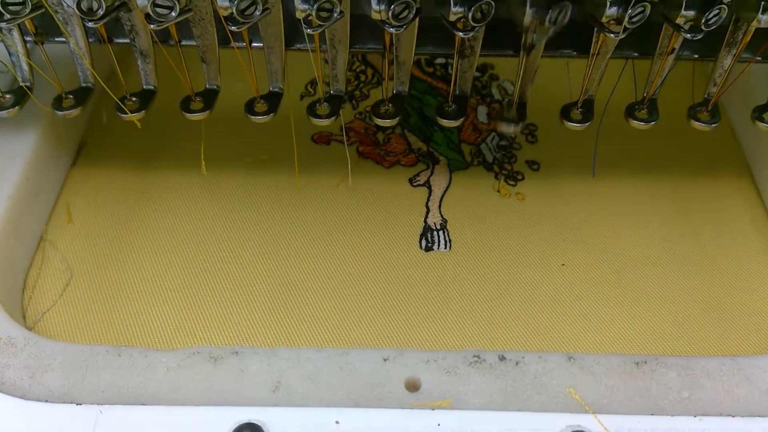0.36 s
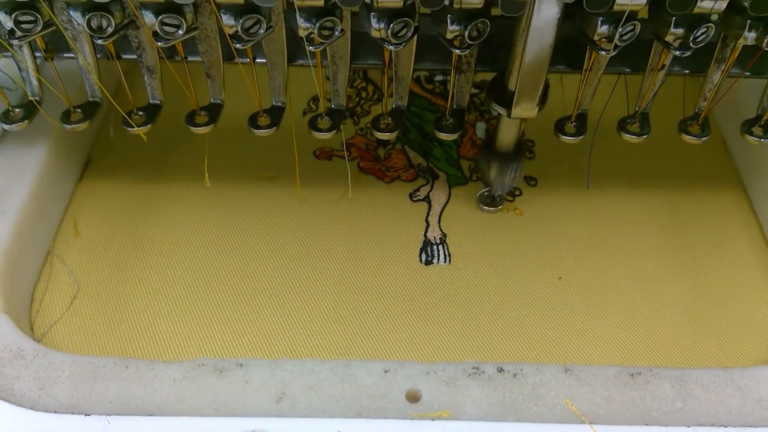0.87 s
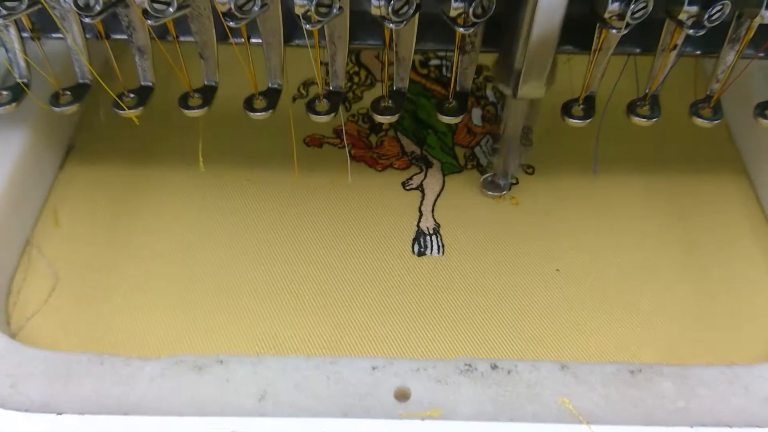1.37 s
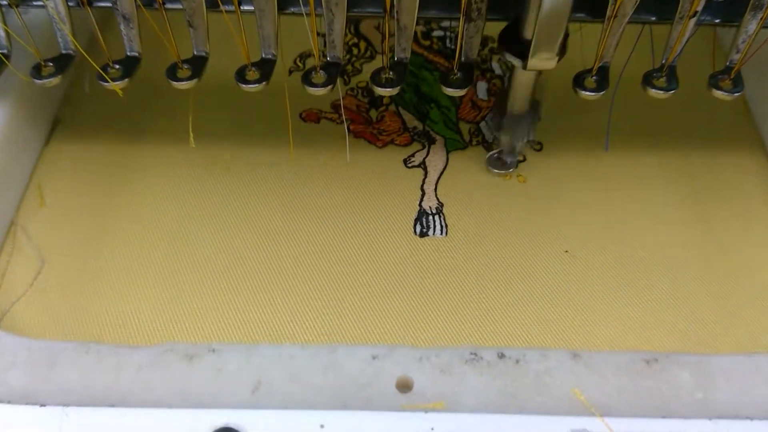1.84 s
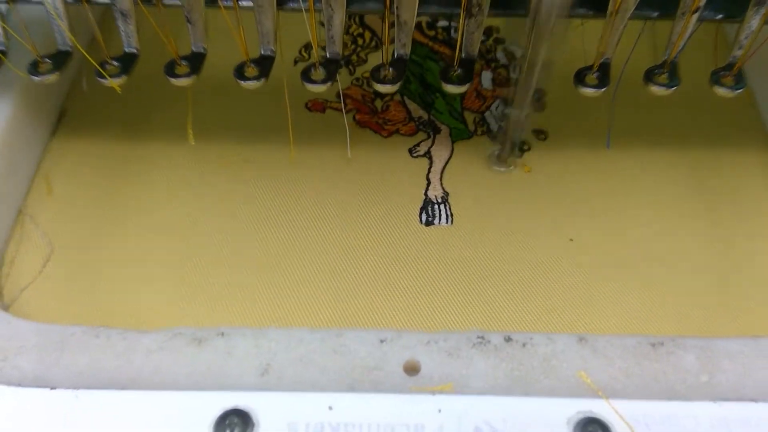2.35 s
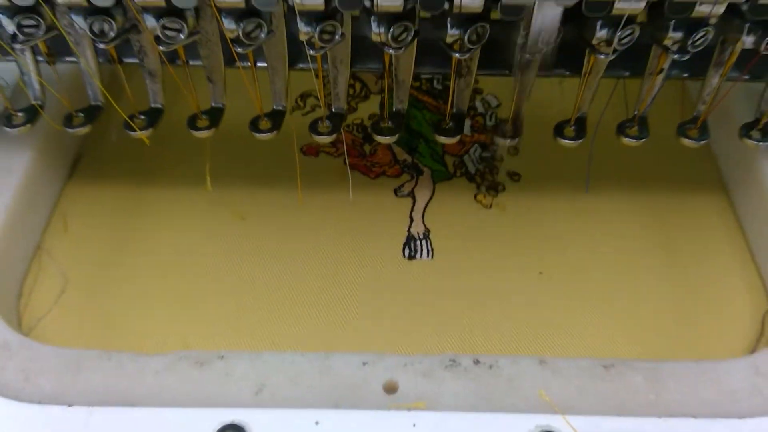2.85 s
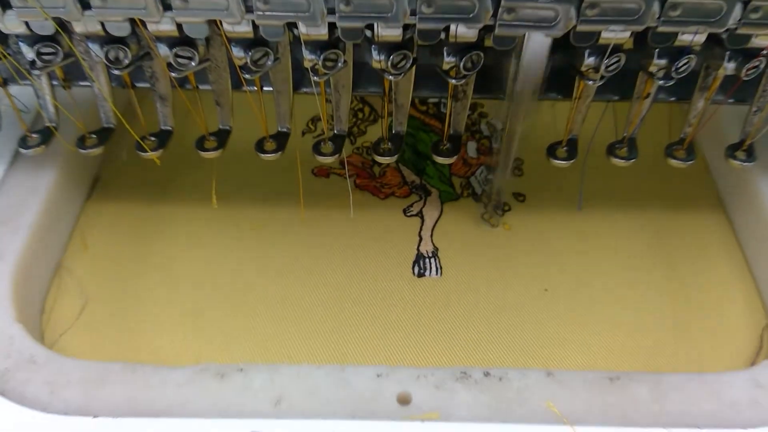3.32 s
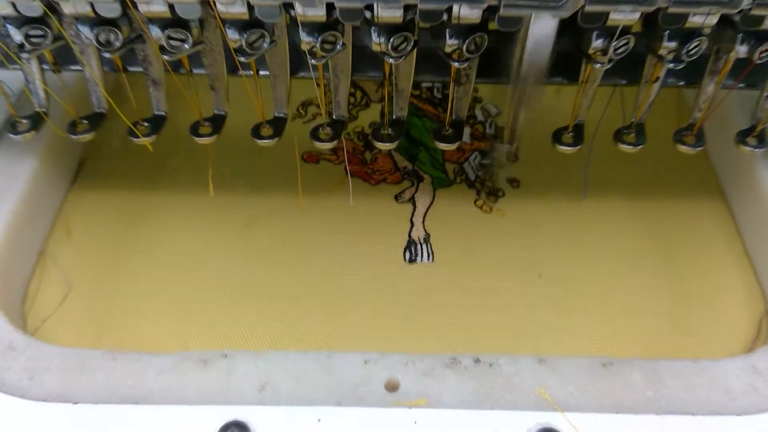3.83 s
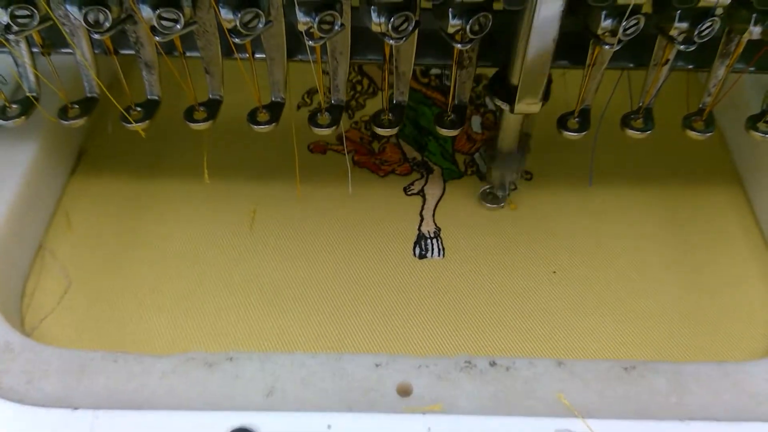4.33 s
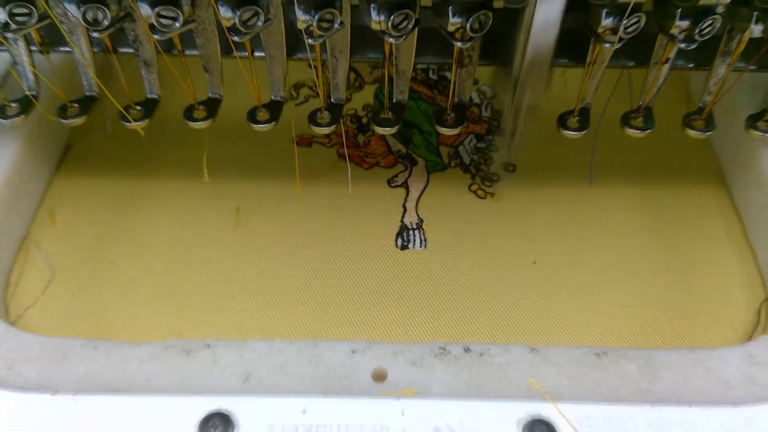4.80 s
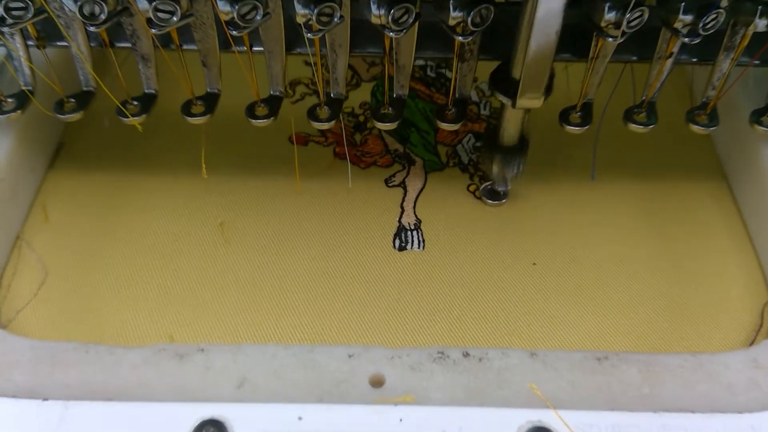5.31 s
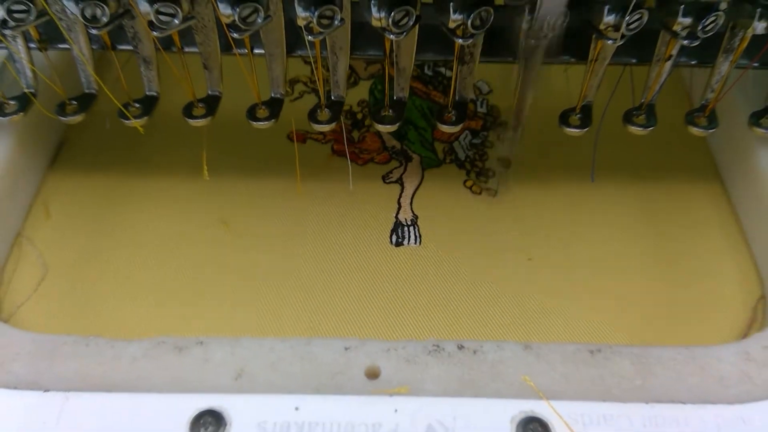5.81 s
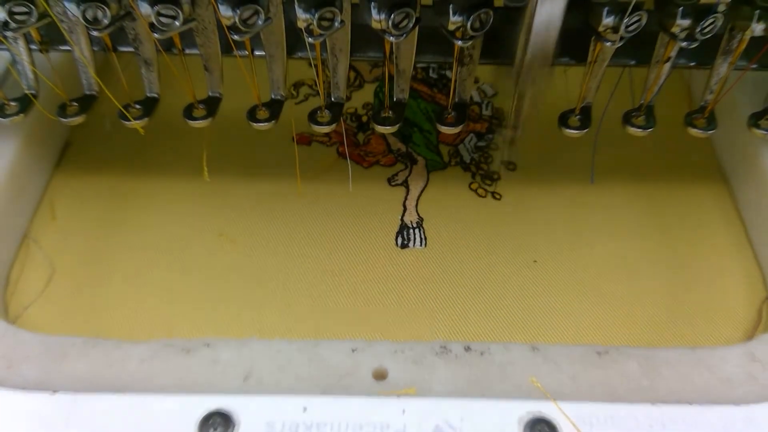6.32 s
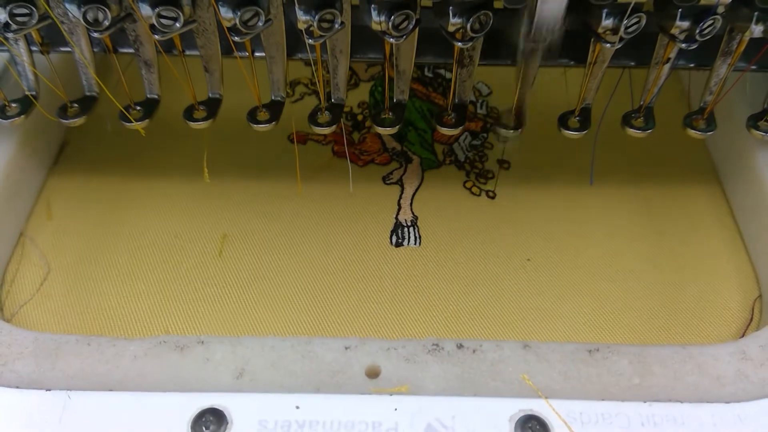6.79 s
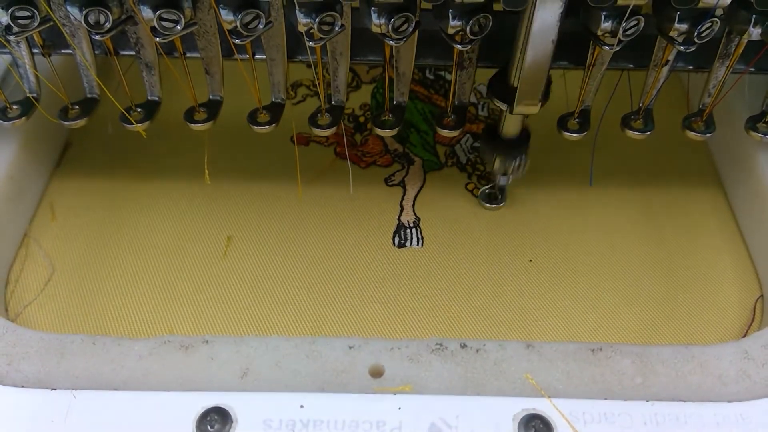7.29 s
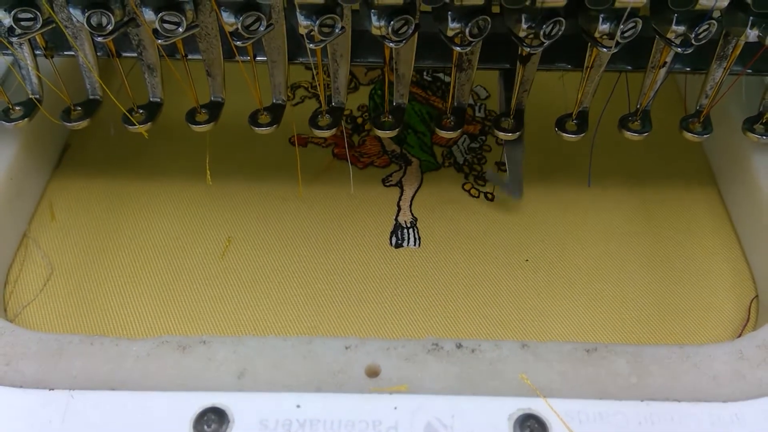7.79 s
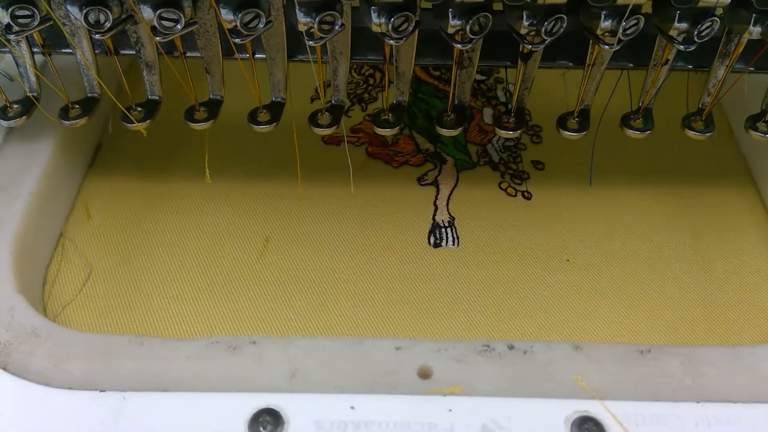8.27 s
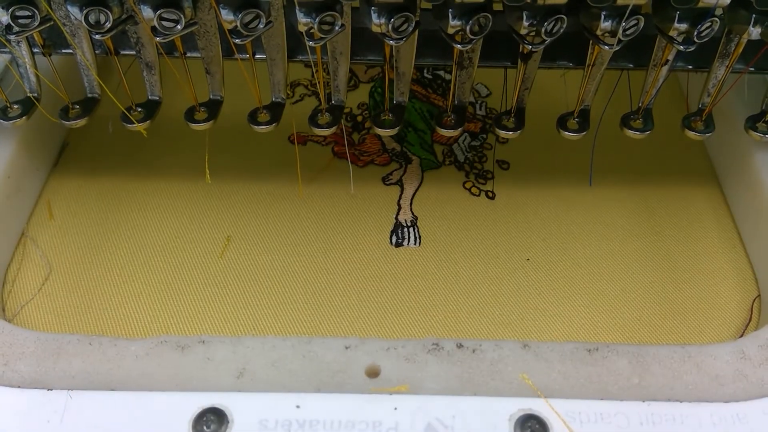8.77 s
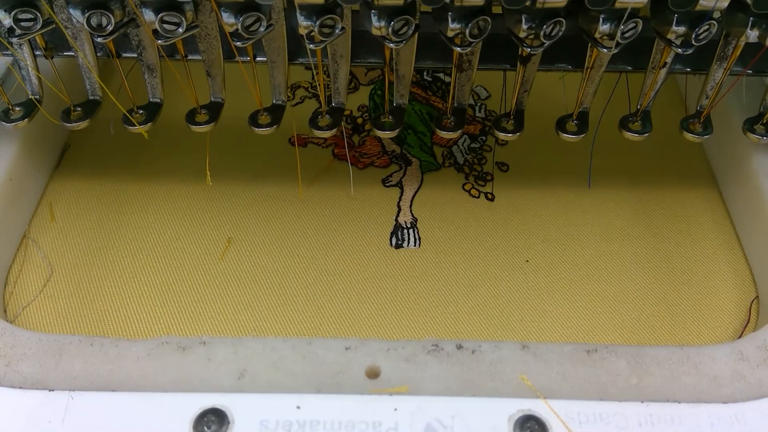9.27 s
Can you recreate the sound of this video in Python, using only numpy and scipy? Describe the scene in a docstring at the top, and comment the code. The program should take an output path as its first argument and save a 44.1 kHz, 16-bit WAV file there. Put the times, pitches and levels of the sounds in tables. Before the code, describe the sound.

A workshop hums softly with a steady fan drone around a close embroidery machine. Faint ticks and dull thuds sound near 0.1 and 0.4 seconds; at 0.7 to 0.9 small motors give a short, falling whirr. Slow first-turn clunks come around 1.2, and from about 1.35 the machine stitches at full speed, roughly thirteen strokes a second. Each stroke is a hard, bright metal clack with jingling needle bars, hook ticks and thin pings that come and go, above a rumbling, knocking bed whose hum swells and sinks. Between 1.6 and 2.6 the hook buzzes harder. It brakes at 6.8 and has stopped by about 7.2. A soft knock follows at 7.35, crisp cutter snaps at 7.6 to 7.8, low drive knocks until 7.95, then latch clicks at 8.23 and sharper ones at 8.46. Quiet hum and faint thuds remain until about 9.6. Bright metal sits right.

```python
"""An embroidery workshop, softly humming: a multi-needle machine starts, stitches about 13 times a second,
stops, then trims the thread and latches. In each shaft turn the presser foot and needle bar strike, the
arm rings, a loose part pings and the bed is knocked. Blows are short pushes that set fading sines ringing;
clatter, rumble and workshop are coloured noise; the hums are steady or wavering sines.
The near microphone port (right) hears the bright metal."""
import sys
import numpy as np
from scipy import signal
from scipy.io import wavfile
from scipy.ndimage import uniform_filter1d

SR = 44100
rng = np.random.default_rng(int(sys.argv[2]) if len(sys.argv) > 2 else 0)


def magnitude_from_level(level_db):
    """Linear magnitude for a level in decibels (20 dB per decade)."""
    exponent = np.asarray(level_db, float) / 20
    return 10 ** exponent


def waveform_to_disk(signal):
    """Save audio, clipped to [-1, 1], as 16-bit WAV at the path in sys.argv[1]."""
    frames = np.transpose(np.atleast_2d(signal))
    scaled = np.clip(frames, -1, 1) * 32767
    samples = np.round(scaled).astype(np.int16)
    wavfile.write(sys.argv[1], SR, samples)


N = 424918  # samples in the scene

SHAFT_HZ = 13.2525  # turns per second
BRAKE_S = 6.79  # the shaft starts to brake
HARDEST = 1.7  # upper limit of the random draws for blows
# for a spell the hook rings harder
DRAG_FROM_S, DRAG_TO_S, DRAG_DB = 1.6, 2.6, 2.9

# balance of the machine's noise between the ports: f/Hz, left minus right level/dB
TILT = [(60, -4), (150, 4), (380, -4), (950, -2), (2380, -3.5), (5980, -13), (15000, -14.5)]
# how alike the two ports hear that noise: f/Hz, likeness (-1 to 1)
SAME = [(60, 1), (180, 0.99), (550, 0.38), (1650, -0.24), (4970, -0.41), (15000, -0.12)]
# what the arm rings with: f/Hz, left level/dB, right level/dB, time to fade by 60 dB/s
ARM = [(1260, 1, 6.5, 0.13), (1450, -32, 4, 0.098), (1568, -5.5, 8, 0.031), (1870, -34, 8, 0.062),
       (2100, -23, -5.5, 0.16)]
# what the presser foot rings with: f/Hz, left level/dB, right level/dB, time to fade by 60 dB/s
FOOT = [(2710, -43, -9, 0.039), (2820, -30.5, -24, 0.13), (3560, -4, -12, 0.14), (3682, -41, 14, 0.051),
        (6200, -24, 1, 0.049)]
# what the needle bar rings with: f/Hz, left level/dB, right level/dB, time to fade by 60 dB/s
BAR = [(2670, -37, 2, 0.093), (3410, -16, -3, 0.19), (3770, -37, -14, 0.1), (4100, -31, -15, 0.076),
       (4860, -50, 0.5, 0.069), (5480, -47, 16.5, 0.019), (6200, -11, -8, 0.033), (6430, -15, -10, 0.081),
       (10280, -24, 0, 0.017), (11620, -26, -9, .014), (13500, -28, -16, .012)]


def read(points, hz):
    """Reads a table along log frequency."""
    f, value = np.transpose(points)
    return np.interp(np.log(hz + 1), np.log(f + 1), value)


def curve(rows, column):
    """Reads a dB column of a table along time, as gain."""
    rows = np.array(rows)
    return magnitude_from_level(np.interp(np.arange(N) / SR, rows[:, 0], rows[:, column]))


def waver(smooth_s):
    """Slow chance: noise smoothed twice, rms 1."""
    size = max(round(smooth_s * SR), 1)
    x = uniform_filter1d(uniform_filter1d(rng.standard_normal(N), size=size), size=size)
    return x / x.std()


def noise(spectrum, tilt, same, patchy_db):
    """Two partly alike channels of coloured noise with drifting patches; their mean has rms 1."""
    frames, hz = N // 256 + 5, np.fft.rfftfreq(1024, 1 / SR)
    a, b, c, d, patches = rng.standard_normal((frames, 513, 5)).T
    patches = uniform_filter1d(uniform_filter1d(patches, size=8, axis=0), size=8, axis=1)
    like = np.clip(read(same, hz), -1, 1)[:, None]
    side = magnitude_from_level(read(tilt, hz)[:, None] / 2)
    first, second = a + 1j * b, c + 1j * d
    z = np.array([first * side, (like * first + np.sqrt(1 - like ** 2) * second) / side])
    z *= magnitude_from_level(read(spectrum, hz)[:, None] + patchy_db * patches / patches.std())
    x = signal.istft(z, nperseg=1024, noverlap=768)[1][:, :N]
    return x / x.mean(0).std()


def strike(times, db, modes, scrape_ms, spread_db, ragged=0.88, wander=0, size=1):
    """A short push, smooth or ragged, wakes ringing modes unevenly; each blow's right-hand peak is db.

    Parts with play sit in one of five slightly detuned ways (wander is the share of pitch)."""
    hz, left_db, right_db, t60 = np.transpose(modes)
    t = np.arange(round(.8 * SR * t60.max())) / SR
    out = np.zeros((2, N + SR))
    seats = 1 + wander * rng.standard_normal((5 if wander else 1, len(hz), 1))
    rings = magnitude_from_level(-60 * t / t60[:, None]) * np.sin(2 * np.pi * hz[:, None] * seats * t)
    u = t[:1000] * 1000 / scrape_ms
    # neighbours are alike over size blows
    draws = uniform_filter1d(rng.standard_normal((len(db), 1100)), size=size, axis=0) * np.sqrt(size)
    for s, level_db, draw in zip(times, db, draws):
        push = (1 - ragged + ragged * draw[100:]) * u ** 2 * np.exp(-4 * u)
        ring = rings[int(abs(draw[99]) * 1e4) % len(rings)]
        woken = magnitude_from_level(np.array([left_db, right_db]) + spread_db * draw[:len(hz)]) @ ring
        blow = signal.fftconvolve(woken, push[None], axes=1)
        out[:, round(s * SR):][:, :blow.shape[1]] += blow * magnitude_from_level(level_db) / abs(blow[1]).max()
    return out[:, :N]


def bursts(times, db, t60, rise_ms=1.6):
    """A gain that swells at each blow and dies away."""
    train, t = np.zeros(N), np.arange(8000) / SR
    np.add.at(train, np.round(np.asarray(times) * SR).astype(int), magnitude_from_level(db))
    swell = (1 - np.exp(-t * 1000 / rise_ms)) ** 2 * magnitude_from_level(-60 * t / t60)
    return signal.oaconvolve(train, swell)[:N]


def orders(table, lag):
    """Sines locked to the shaft, at whole multiples of its speed; lag is in turns."""
    turns = np.arange(N) * SHAFT_HZ / SR - lag
    return sum(magnitude_from_level([[left_db], [right_db]]) * np.sqrt(2) * np.cos(2 * np.pi * round(k) * turns)
               for k, left_db, right_db in table)


def workshop():
    """The workshop hums softly behind: steady coloured noise."""
    # colour of the workshop noise: f/Hz, level/dB per Hz before the overall level is set
    colour = [(15, -42), (25, -10), (97, -10), (229, -3), (309, -31), (373, 4.5), (463, -26), (545, -7.5),
              (624, -13), (1100, -15.5), (1400, -22), (2690, -22.5), (3820, -27.5), (9570, -37),
              (16000, -42.5)]
    tilt = [(100, 1.9), (700, 1.0), (5000, 1.1)]
    same = [(100, 1.0), (700, 0.089), (3000, 0.024)]
    return magnitude_from_level(-48.5) * noise(colour, tilt, same, patchy_db=0.5)


def whirr(rows):
    """A fuzzy gliding tone: slow noise riding on a moving pitch."""
    s, hz, db, blur_hz = np.transpose(rows)
    t = np.arange(N) / SR
    low_pass = signal.butter(2, max(blur_hz[0], 5), fs=SR)
    fuzz = signal.lfilter(*low_pass, rng.standard_normal((2, N)))
    tone = np.sin(2 * np.pi * np.cumsum(np.interp(t, s, hz)) / SR)
    return fuzz / fuzz.std() * tone * magnitude_from_level(np.interp(t, s, db, -200, -200))


def motors():
    """Small motors whirr briefly and a fan drones throughout, each a fuzzy tone."""
    # one list for each tone: t/s, f/Hz, level/dB, blur/Hz (the first row's blur serves the whole tone)
    tones = [
        [(.7, 1870, -66, 40), (.73, 1850, -50, 40), (.77, 1750, -55, 40), (.79, 1750, -56, 40)],
        [(.76, 1460, -60, 70), (.8, 1450, -49, 45), (.85, 1390, -48, 45), (.87, 1400, -66, 25)],
        [(0, 534.7, -55, 6.6), (9.64, 531.4, -52, 7)],
    ]
    return sum(map(whirr, tones))


def single_rings():
    """Short single-pitch rings, faint or strong: idle ticks, first-turn hits and a late knock."""
    # rings of one fading sine each: t/s, peak level/dB, f/Hz
    ring_list = [(.048, -48, 6300), (.055, -51, 5100), (.435, -50.5, 5600), (.445, -54.5, 5100),
                 (.705, -50, 4500), (.8, -50, 6600), (1.01, -49, 5800), (1.035, -51, 6450),
                 (1.168, -31.5, 1130), (1.266, -28.5, 6430), (7.104, -61, 2100), (7.17, -54, 1260),
                 (7.35, -41, 1720), (7.38, -48, 2200), (8.136, -38, 2200), (8.174, -47, 2250)]
    return sum(strike([t], [db], [(hz, -24, 0, 0.054)], 17.0, spread_db=0) for t, db, hz in ring_list)


def cutter_return():
    """The cutter drive knocks as it runs back: low, briefly ringing sines."""
    # knocks of the drive: t/s, peak level/dB, f/Hz
    drive_knocks = [(7.787, -41, 1340), (7.81, -36, 1320), (7.826, -42, 1060), (7.868, -34, 950),
                    (7.892, -35, 850), (7.918, -45, 794), (7.938, -47, 950)]
    t60 = 0.081  # s
    return sum(strike([t], [db], [(hz, -4, 0, t60), (hz, -8, -7, t60)], 11.0, spread_db=0)
               for t, db, hz in drive_knocks)


def clicks(rows, modes):
    """Small steel parts snap: their modes ring briefly inside a broad crack of noise."""
    out = np.zeros((2, N))
    for s, db, pan_db, crack_db, crack_hz in rows:
        scrape_ms = 1000 * 9.9 / crack_hz  # a snap's time scale is 9.9 cycles of its crack
        start_s = s - scrape_ms / 1000
        # a blow wakes most the modes near the pitch of its crack
        near = [(hz, g - 14 * abs(np.log2(hz / crack_hz)), t60) for hz, g, t60 in modes]
        panned = [(hz, g + pan_db, g, t60) for hz, g, t60 in near]
        ring = strike([start_s], [db], panned, 2.5 * scrape_ms, spread_db=2)
        band = signal.butter(3, [crack_hz * .62, min(crack_hz * 1.7, 16000)], "bandpass", fs=SR)
        swell = 3 * bursts([start_s], [crack_db], scrape_ms * .012, scrape_ms * 1.5)
        # the parts rattle on
        swell += bursts([s], [min(crack_db - 13.5, db - 17)], scrape_ms * 0.29, scrape_ms)
        crack = signal.lfilter(*band, rng.standard_normal((2, N))) * swell
        out += ring + crack * magnitude_from_level([[pan_db], [0]])
    return out


def thread_cutter():
    """The thread cutter trims in a run of steel snaps."""
    # snaps: t/s, ring peak level/dB, left minus right level/dB, crack level/dB before shaping, crack f/Hz
    cuts = [(7.6, -55, -3, -32, 1490), (7.619, -21, -14, -29, 2970), (7.625, -15, -19, -30, 6970),
            (7.627, -28, -17, -21, 12200), (7.64, -27, -11, -39, 2430), (7.613, -43, -13, -44, 13500),
            (7.62, -29, -17, -31, 13500), (7.632, -26, -12, -35, 3490), (7.642, -33, -15, -40, 5160),
            (7.655, -43, -12, -41, 4660), (7.688, -36, -12, -36, 5200), (7.7, -31, -12, -31, 2140),
            (7.718, -29, -14, -38, 3080), (7.675, -35, -7, -40, 2980), (7.712, -32, -19, -38, 9500),
            (7.728, -37, -12, -45, 4200), (7.71, -25.5, -19, -24, 2610), (7.775, -27, -19, -28, 14000),
            (7.824, -37, -14, -40, 7760), (7.885, -42, -11, -44, 5400), (7.922, -56, 0, -49, 9000),
            (8.138, -45, -7, -46, 1810), (8.144, -40, -7, -47, 2300), (8.14, -53, -8, -50, 5700)]
    # what the cutter rings with: f/Hz, level/dB before the crack's pitch weighs it, time to fade by 60 dB/s
    cutter_modes = [(1200, 11, 0.04), (1790, 5, 0.048), (1990, 0, 0.045), (2240, 2, 0.06),
                    (2700, -10, 0.037), (3600, -13, .04), (3036, 1, 0.07), (4180, -7, .04),
                    (4900, -4, 0.025), (5250, -1, 0.028), (5760, -7, .03), (7330, -14, 0.06),
                    (8960, -16, 0.026), (11200, -7, .03), (6600, -27, 0.032), (12000, -0.5, 0.037),
                    (12700, -11, .02), (13800, -4, .025), (15500, -15, .02), (14200, -11, .025)]
    return clicks(cuts, cutter_modes)


def latch():
    """The latch clicks twice over, each time as a cluster of steel snaps."""
    # snaps: t/s, ring peak level/dB, left minus right level/dB, crack level/dB before shaping, crack f/Hz
    snaps = [(8.228, -31.5, -12, -30, 1448), (8.228, -44, -13, -37, 13000), (8.229, -45, -13, -39, 2700),
             (8.25, -44, -8, -48, 1710), (8.448, -37, -19, -50, 4300), (8.458, -19.5, -21, -45, 4520),
             (8.458, -33, -15, -38, 9660), (8.457, -35, -7, -38, 1580), (8.473, -20.5, -17, -37, 4240),
             (8.476, -46, -15, -41, 9200), (8.463, -27, -17, -34.5, 4300), (8.474, -29, -18, -37, 1570)]
    # what the latch rings with: f/Hz, level/dB before the crack's pitch weighs it, time to fade by 60 dB/s
    latch_modes = [(1465, -18, 0.094), (1634, -12, 0.045), (2300, -20, .05), (2720, -10, 0.052),
                   (3600, -8, .04), (3200, -8, 0.036), (4240, -4, 0.042), (4210, -24, 0.25),
                   (4290, -27, .25), (4130, -21, 0.17), (4350, -27, 0.13), (4500, -29, .12),
                   (3950, -28, .1), (5100, -31, .08), (9100, 2, 0.025), (9800, 5, 0.035), (12200, 1, .02),
                   (14200, -8, .03), (10500, -7, 0.053), (11340, 5, .02), (13300, -18, .05)]
    return clicks(snaps, latch_modes)


def bed():
    """Knocks on the shaft's clock ring the bed, which also hums and rumbles; the stand hums low."""
    # what bed and stand ring with: f/Hz, left level/dB, right level/dB, time to fade by 60 dB/s
    bed_modes = [(109.4, -16, -9.5, .17), (180.6, -23, -30, .17), (225.2, -1.9, -.2, .17),
                 (247.4, -30, -7.7, .168), (287.4, -16.4, -6.3, .156), (356.5, -10.2, .4, .064),
                 (418.4, -25.4, -11, .074), (537.2, -27.6, -4.1, .117), (759.1, -22, -2, .17),
                 (859.9, -15.5, -35, .167), (946.1, -7, -8.5, .146), (979.4, -21.3, -8.1, .078),
                 (1016.1, -35, -6, .149)]
    # cams and links knock at set points of each turn:
    # t/ms after the needle bar, level/dB before load and filters, push/ms, sign of the push
    cam_knocks = [(-18.22, -19.5, .63, -1), (-5.96, -13.8, .89, 1), (-2.3, -15.2, .15, 1),
                  (8.11, -13.7, .15, -1), (13.42, -13.9, .24, -1), (18.58, -15.2, 1.98, -1),
                  (23.22, -11.2, .54, -1), (25.79, -19.4, .33, -1), (42.7, -9.7, 1.22, 1)]
    # soft thuds through the bed while the needle rests: t/s, peak level/dB before the filters
    soft_thuds = [(0.084, -22), (0.444, -28), (0.885, -36), (0.928, -34), (1.187, -21), (1.294, -36),
                  (7.346, -19.5), (7.469, -37), (7.554, -29), (7.873, -18), (8.147, -27), (8.768, -21.5),
                  (9.354, -23), (9.449, -19.5)]
    # colour of the rumble: f/Hz, level/dB per Hz, before its level is set
    rumble_colour = [(15, -44), (25, -29), (91, -10), (124, -12.5), (230, 0.5), (279, -6.5), (426, -13.5),
                     (543, -11), (628, -29.5), (750, -18), (926, -19.5), (1090, -41), (1200, -56),
                     (1560, -56), (2640, -120)]
    # rumble following the load on the drive: t/s, level/dB before the running machine's 2.4 dB cut
    drive_load = [(0, -43.5), (.4, -48.5), (1.0, -41.5), (1.25, -38.5), (1.31, -16), (1.74, -20),
                  (2.04, -17.5), (3.27, -18.5), (4.1, -19), (6.85, -17.5), (6.96, -19.5), (7.0, -23.5),
                  (7.14, -30.5), (7.18, -36), (7.27, -44), (7.56, -38), (7.8, -38.5), (7.88, -36),
                  (7.93, -38), (8.07, -43.5), (9.06, -47.5), (9.63, -47)]
    # low hum of the stand: multiple of the shaft speed, left level/dB, right level/dB, before its swell
    low_hum_orders = [(3, -29.5, -61), (4, -30, -27), (7, -25.5, -22)]
    # the bed's hum: multiple of the shaft speed, left level/dB, right level/dB, before its swell
    hum_orders = [(17, -34, -38), (19, -29, -31.5)]
    # the hum builds up, then sinks and swells again: t/s, level/dB
    hum_swell = [(1.3, -21), (1.8, -13), (2.1, -0.5), (2.8, 5.5), (3.5, 1), (4.4, 5.5), (4.8, -9),
                 (5.5, -3), (6.3, -7), (6.8, 6)]
    # bass reaches the far port (left) only once the whole stand shakes: t/s, level/dB
    far_bass = [(1.2, -3), (1.3, -13), (1.5, -14.5), (1.83, -16), (1.87, -4), (2.05, -1.5), (6.9, -2),
                (7.05, -6), (7.3, -6)]

    turn_s = np.arange(18, 95) / SHAFT_HZ
    knocks = 0
    for ms, db, push_ms, sign in cam_knocks:
        chance = np.minimum(rng.standard_normal(len(turn_s)), HARDEST)
        # a knock keeps its colour for about six turns
        knocks = knocks + sign * strike(turn_s + ms / 1000, db + 1.6 * chance, bed_modes, push_ms,
                                        spread_db=3.0, ragged=0.04, size=6)
    running = np.interp(np.arange(N) / SR, [1.3, 1.4, 6.95, 7.15], [0, 1, 1, 0])
    level = curve(drive_load, 1) * magnitude_from_level(0.71 * waver(0.023))
    load = level / magnitude_from_level(-19.5)  # knocks grow with the rumble

    swell = curve(hum_swell, 1)
    low_hum = orders(low_hum_orders, 0.02) * magnitude_from_level(-4 - 0.5 * waver(0.17)) * swell ** 0.055 * running ** 2
    hum = orders(hum_orders, -0.0016) * swell * magnitude_from_level(2.5 * waver(0.12))

    rumble = magnitude_from_level(-2.4 * running) * level * noise(rumble_colour, TILT, SAME, patchy_db=0.27)
    upper = signal.lfilter(*signal.butter(2, 600, "highpass", fs=SR), rumble)
    rumble = rumble - upper * (1 - np.clip(load, 0, 1) ** 0.38)  # duller when the machine idles

    thuds = strike(*np.transpose(soft_thuds), bed_modes[2:6], 9, spread_db=2.5, ragged=.5)
    # knocks and thuds carry nothing below about 70 Hz
    no_sub = signal.butter(2, 70, "highpass", fs=SR)
    struck = signal.lfilter(*no_sub, running ** 2 * load * knocks + thuds)
    struck = signal.filtfilt(*signal.butter(3, 1150, fs=SR), struck)  # nor anything above about 1150 Hz

    left, right = struck + running * (hum + low_hum) + rumble
    bass = signal.filtfilt(*signal.butter(2, 850, fs=SR), left)
    return np.array([left - bass * (1 - curve(far_bass, 1)), right])


def loose_parts(s, tick_db):
    """The hook ticks and buzzes each turn; idle needle bars rattle in their guides after each stroke."""
    # the hook's tick: f/Hz, left level/dB, right level/dB, time to fade by 60 dB/s
    hook_modes = [(3083, -9, 10, 0.16), (3420, -7, -17, 0.05), (4040, -26, -1, 0.17), (6520, -27, -9, 0.11)]
    # the hook's buzz through the stroke: f/Hz, left level/dB, right level/dB, time to fade by 60 dB/s
    buzz_modes = [(4310, -12.5, -1.5, 0.086), (2770, -13, -5, 0.048), (2250, -9, -11, .04)]
    # idle needle bars: f/Hz, left level/dB, right level/dB, time to fade by 60 dB/s
    idle_modes = [(1870, -14, -11, 0.073), (2465, -10, 6, 0.065), (4300, -15, -1, 0.082),
                  (5100, -16, -8, 0.049), (5600, -6, 7, 0.065), (6720, -20, -12, 0.036),
                  (7840, -20, -1, 0.043), (9100, -18, 1.5, 0.051), (10870, -24, -11, .04),
                  (12660, -24, -3, 0.044)]

    tick = strike(s - 21.5 / 1000, tick_db, hook_modes, 3.2, spread_db=3.5, wander=0.0049)
    dragging = (s > DRAG_FROM_S) * (s < DRAG_TO_S)
    buzz_db = tick_db - 0.5 - 5.5 + 2.5 * DRAG_DB * dragging
    buzz = strike(s - .012, buzz_db, buzz_modes, 34, spread_db=2, ragged=0.63)

    jingles_per_s = 190
    which, after, size = rng.random((round(jingles_per_s * (s[-1] - s[0])), 3)).T
    # uneven rattles crowd after each stroke and die as the shaft brakes
    when = s[(which * (len(s) - 1)).astype(int)] - .006 + after ** 1.8 / SHAFT_HZ
    jingle_db = -41.5 + 12 * size ** 2 - 120 * np.maximum(when - BRAKE_S, 0)
    jingles = strike(when, jingle_db, BAR + ARM[1:] + idle_modes, 2.7, spread_db=7.5, wander=0.0084)
    return tick + jingles + buzz


def stitches():
    """Times and strengths of one turn's blows: foot, needle bar, arm, hook, loose part going up and at the top."""
    # how far the frame moves between stitches: t/s, travel (0 to 1)
    frame_travel = [(1.36, 0.34), (1.7, 0.83), (2.4, 0.88), (2.9, 0.5), (3.2, 0.03), (3.6, 0.14),
                    (4.0, 0.24), (4.9, 0.78), (5.6, 0.34), (6.3, 0.37), (6.6, 0.86)]
    # long moves soften the foot and shake arm and hook; each of the next three holds:
    # level/dB at no travel, level/dB more at full travel, chance/dB
    foot_blow = (-20.5, -7.5, 4.4)
    # as above, for the arm: level/dB at no travel, level/dB more at full travel, chance/dB
    arm_blow = (-28, 7.5, 1.4)
    # as above, for the hook: level/dB at no travel, level/dB more at full travel, chance/dB
    hook_blow = (-35.5, 2.9, 3)
    # when the loose part has worked loose and hits at the top: from t/s, to t/s, level/dB before chance
    loose_spells = [(1.33, 1.92, -30.5), (1.99, 2.22, -34), (2.83, 3.28, -28.5), (3.44, 3.88, -29.5),
                    (4.27, 4.78, -27.5), (5.32, 5.62, -30.5), (5.77, 6.0, -37)]

    first_turn, last_turn = 18, 91  # shaft turns that make a stitch
    turn = np.arange(first_turn, last_turn + 1)
    play, *chance = rng.standard_normal((len(turn), 7)).T
    chance = np.minimum(chance, HARDEST)
    first, last = turn == first_turn, turn == last_turn
    # play in the linkage is 0.45 ms; the first and last strokes are slow, so 3.4 ms late
    s = turn / SHAFT_HZ + (0.45 * play + 3.4 * (first | last)) / 1000
    travel = np.interp(s, *np.transpose(frame_travel))
    soft_db = -1.5 * first - 12.5 * last
    steady = 0.32  # share of the foot's chance left when the frame barely moves
    chance[0] = chance[0] * (steady + (1 - steady) * travel)

    foot, arm, hook = (db + more_db * travel + chance_db * c + soft_db
                       for (db, more_db, chance_db), c in zip((foot_blow, arm_blow, hook_blow), chance))
    # what the foot does not take, the needle bar does
    bar = -23 - 0.27 * foot_blow[2] * np.maximum(chance[0], -HARDEST) + 1.5 * chance[3] + soft_db
    dragging = (s > DRAG_FROM_S) * (s < DRAG_TO_S)
    hook = hook + DRAG_DB * dragging
    foot = foot - 5 * dragging  # the foot lands softer meanwhile

    # the loose part pings on every upstroke, a little more while loose
    tight_db = -67
    loose_db = sum((db - tight_db) * (s > a) * (s < b) for a, b, db in loose_spells)
    up = -35.5 + 0.047 * loose_db + 5 * chance[4] + soft_db
    top = tight_db + loose_db - 2 * chance[5] + soft_db
    return s, foot, bar, arm, hook, up, top


def head(s, foot_db, bar_db, arm_db, up_db, top_db):
    """Foot, needle bar and arm ring; loose parts rattle on after each blow over a steady clatter."""
    # slow first turns: t/s, level/dB
    first_turns = [(1.171, -36.5), (1.27, -28), (1.298, -56), (1.3496, -26)]
    # the loose part: f/Hz, left level/dB, right level/dB, time to fade by 60 dB/s
    ping_modes = [(9100, -42, 12.5, 0.014), (6450, -39, 1.5, 0.059), (14000, -30, -2, 0.006)]
    # the needle bar chatters around each blow: t/ms later, level/dB against the blow before chance and lift
    bar_chatter = [(-13.5, -6), (3, -3), (5, -6), (9.5, -10), (14, -21), (21, -16), (45.5, -17)]
    # colour of gears, hook and thread: f/Hz, level/dB per Hz, before its level is set
    hiss_colour = [(530, -7.5), (900, 0), (1120, -20), (1260, -4), (1360, -16), (1830, -9), (2470, -20.5),
                   (3430, -18), (5100, -28.5), (5550, -26), (6970, -33.5), (9200, -33.5), (10000, -41.5),
                   (13800, -43.5), (16000, -66)]
    # level of the bright ticks over time, against the needle bar and before chance: t/s, level/dB
    spark_level = [(1.3, -4), (1.55, -8), (1.8, 25), (2.1, -17), (2.8, -4), (3.3, -1), (3.8, 9), (4.2, 11),
                   (4.6, -3), (5.2, 0), (5.7, 3), (6.2, -6), (6.7, 8)]

    first_s, first_db = np.transpose(first_turns)
    foot_s = s - 8.5 / 1000
    foot = strike(np.r_[foot_s, first_s], np.r_[foot_db + 3, first_db], FOOT, 2.95, spread_db=5.5, wander=0.0294)
    bar = strike(s - .0025, bar_db + 2.0, BAR, 2.84, spread_db=3.0, wander=0.0147)
    for ms, db in bar_chatter:
        play, size = rng.standard_normal((len(s), 2)).T
        bar = bar + strike(s + (ms + 0.7 * play) / 1000, bar_db + db + 1.4 * size, BAR + FOOT + ARM[1:], 2.2,
                           spread_db=5.0, wander=0.025)
    arm = strike(np.r_[s - .005, first_s], np.r_[arm_db + 5, first_db], ARM, 14, spread_db=1.5)

    # the loose part has play; it strikes going up and at the top, and bounces once
    late_up, late_top = rng.uniform(-0.00062, 0.0009, (len(s), 2)).T
    ping_s = np.r_[s + 14 / 1000 + late_up, s + 44 / 1000 + late_top]
    ping_db = np.r_[up_db, top_db]
    ping = strike(ping_s - .001, ping_db + 3.0, ping_modes, 6.0, spread_db=3.5)
    graze = strike(ping_s + 3 / 1000, ping_db - 4.5, ping_modes, 3.1, spread_db=3)

    blow_s, blow_db = np.r_[s - .002, foot_s, first_s], np.r_[bar_db, foot_db, first_db]
    rattle = magnitude_from_level(-5.5) * bursts(blow_s, blow_db, t60=0.068, rise_ms=1.4)
    rattle += magnitude_from_level(-20.5) * bursts(blow_s, blow_db, t60=0.031)
    tick = magnitude_from_level(-1.0) * bursts(ping_s, ping_db, t60=0.034, rise_ms=5.4)

    # gears, hook and thread between blows
    creep_db, clatter_db = -52, -35
    turning = np.interp(np.arange(N) / SR, [.9, 1.1, 7.1, 7.3], [0, 1, 1, 0])
    clatter = turning * curve([(1.2, creep_db), (1.287, clatter_db), (BRAKE_S, clatter_db), (6.92, creep_db)], 1)
    grain = uniform_filter1d(rng.standard_normal(N), size=130) * np.sqrt(130)  # teeth and links touch unevenly
    wide = noise(hiss_colour, TILT, SAME, patchy_db=3.5) * magnitude_from_level(1.5 * grain)
    bright = signal.sosfilt(signal.butter(4, 7050, "highpass", fs=SR, output="sos"), wide)

    # in the bright part single links tick, nine a turn, crowding around the stroke
    when, size = rng.random((2, len(s), 9))
    spark_s = s[:, None] + (-12 + 47 * when ** 1.4) / 1000
    level_db = np.interp(s, *np.transpose(spark_level))
    spark_db = (bar_db + level_db)[:, None] - 11.5 + 17 * size ** 3
    sparks = bursts(spark_s.ravel(), spark_db.ravel(), t60=0.019, rise_ms=2.9)
    # the last term lifts the bright part of the steady clatter
    hiss = wide * (clatter + rattle + tick) + bright * (sparks - (1 - magnitude_from_level(1.5)) * clatter)
    return foot + bar + arm + graze + ping + hiss


def scene():
    """Workshop and machine together."""
    background = workshop() + motors() + single_rings()
    trimming = cutter_return() + thread_cutter() + latch()
    s, foot_db, bar_db, arm_db, hook_db, up_db, top_db = stitches()
    stitching = bed() + loose_parts(s, hook_db) + head(s, foot_db, bar_db, arm_db, up_db, top_db)
    return background + trimming + stitching


def top_cut(x):
    """Nothing passes above the cut-off."""
    return signal.sosfilt(signal.butter(12, 16370, fs=SR, output="sos"), x)


def record(dry):
    """The microphone drops the deepest bass, below about 12 Hz."""
    mix = signal.lfilter(*signal.butter(1, 12, "highpass", fs=SR), dry)
    return top_cut(mix)


dry = scene()
out = record(dry)
waveform_to_disk(out)
```